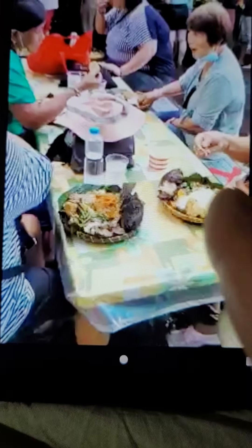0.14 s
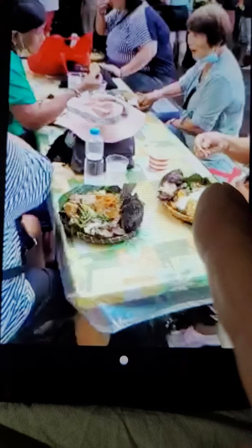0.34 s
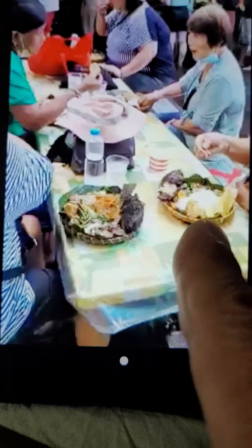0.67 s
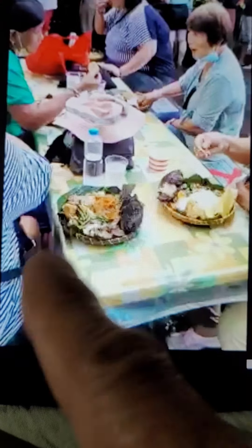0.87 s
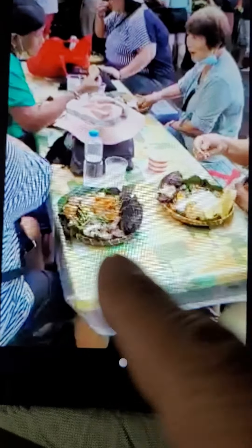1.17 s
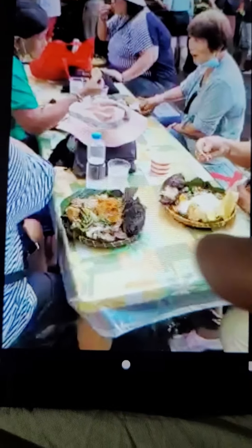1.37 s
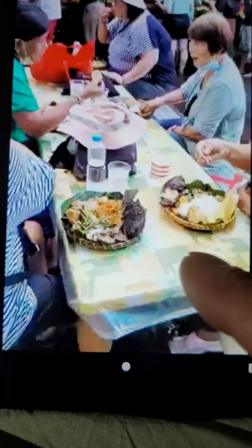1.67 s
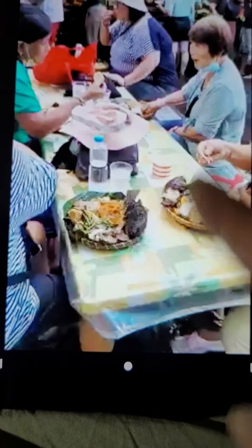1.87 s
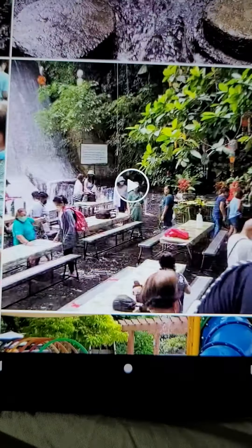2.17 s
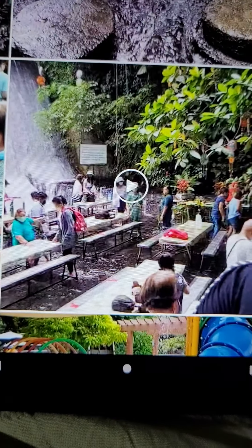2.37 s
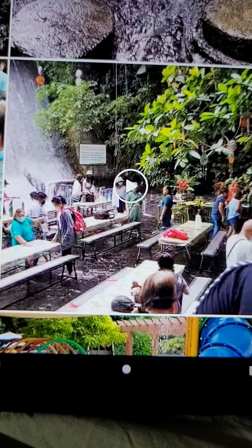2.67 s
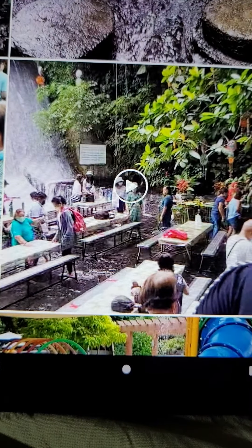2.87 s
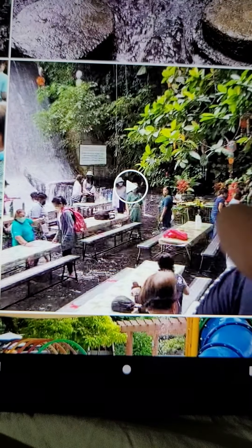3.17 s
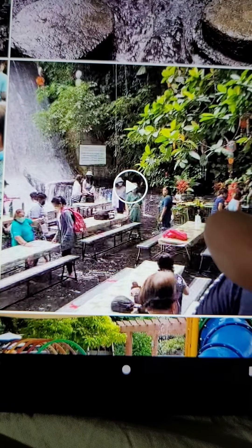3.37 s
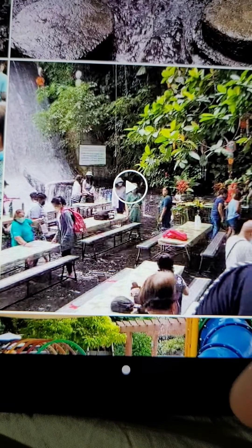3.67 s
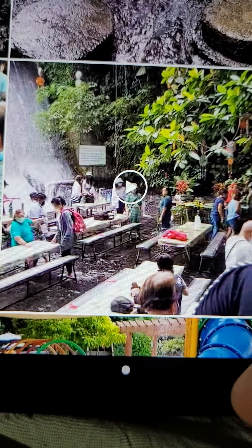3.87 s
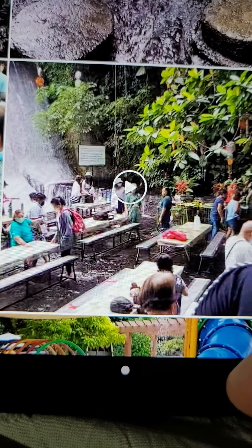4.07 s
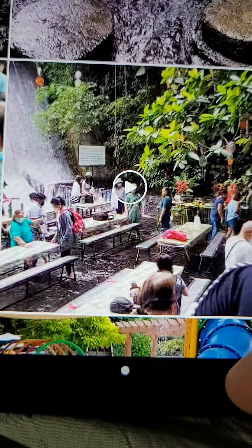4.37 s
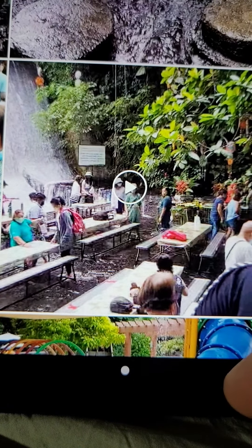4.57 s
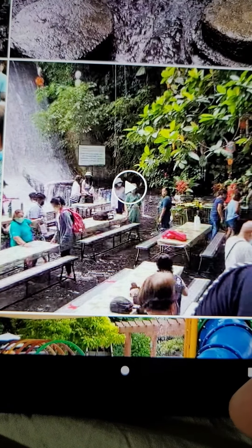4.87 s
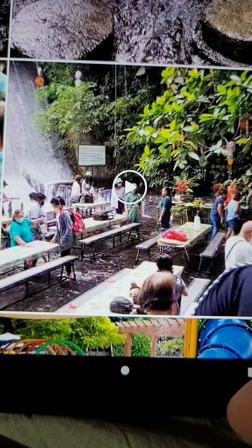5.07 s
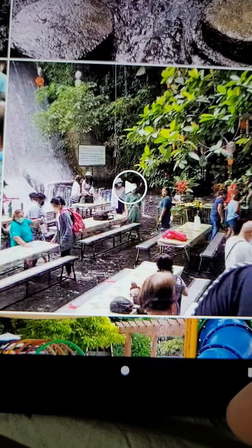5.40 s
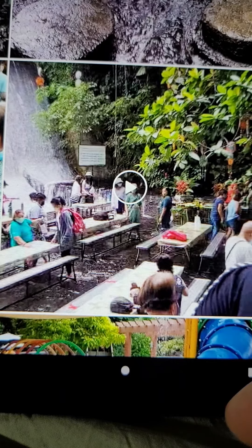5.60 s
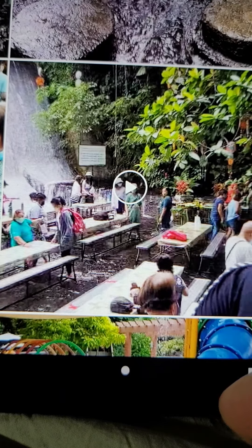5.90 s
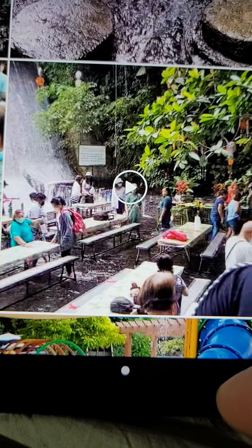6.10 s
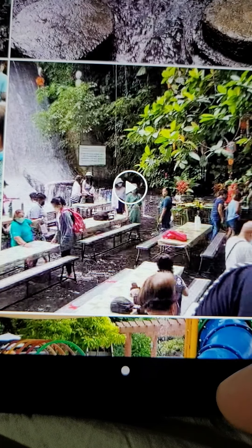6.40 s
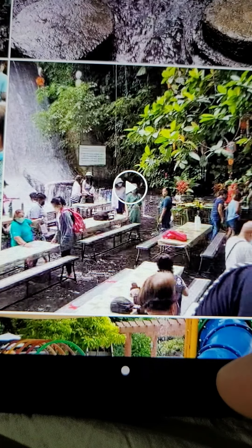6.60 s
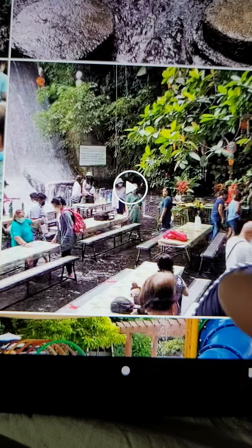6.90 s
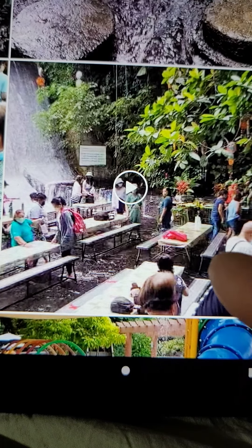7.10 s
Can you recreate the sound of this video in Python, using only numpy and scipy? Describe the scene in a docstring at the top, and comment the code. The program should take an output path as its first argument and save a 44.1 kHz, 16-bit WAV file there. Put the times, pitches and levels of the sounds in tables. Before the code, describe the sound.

The sound is heard inside a moving vehicle, through a phone's microphones, for about seven seconds. A low, nearly pure gear whine leads, throbbing against the engine's hum and a buzzing panel, over a deep drone, road rumble and rushing air. The whine is loudest from about 1 to 2 seconds, then drops and swells unevenly, sinking slightly in pitch toward the end. The air rush is stronger in the first second and eases by 2.5 seconds. Close to the microphones, a hand slides over cloth in soft, short swishes, clearest at about 0.2, 0.6 and 1.3 seconds, with another near 3 seconds and fainter ones between 4.4 and 6.8 seconds. A fingertip makes two tiny dry ticks, at about 0.5 and 2.3 seconds. A faint hiss lies under everything, and the vehicle runs on to the end.

```python
"""A gear whine near 250 Hz, heard inside a moving vehicle. It follows the engine's speed and
throbs against the engine's hum and a buzzing panel, over a low drone. Road rumble and rushing
air ring the cabin. A hand sliding over cloth next to the phone makes soft swishes, and a
fingertip ticks twice. The phone's two microphones add a faint hiss."""
import sys
import numpy as np
from scipy import signal
from scipy.fft import rfft, irfft
from scipy.io import wavfile
from scipy.ndimage import uniform_filter1d

SR = 44100
rng = np.random.default_rng(int(sys.argv[2]) if len(sys.argv) > 2 else 0)


def persist_wave(psi):
    """Save psi, clipped to +-1, as 16-bit WAV."""
    counts = np.round(np.clip(psi, -1, 1) * 32767).astype(np.int16)
    wavfile.write(sys.argv[1], SR, np.atleast_2d(counts).T)


N = 319725
T = np.arange(N) / SR
HZ = np.maximum(np.fft.rfftfreq(N, 1 / SR), 1)

# how fast the engine fires and how loud the gears whine: time_s, firing_hz, whine_db
DRIVE_TRAIN = [(0, 60.74, -33), (.35, 60.72, -29), (.85, 60.78, -29), (1.1, 61.45, -27), (2.0, 61.27, -27),
               (2.18, 60.76, -31.5), (2.36, 59.88, -39.5), (2.8, 60.13, -36.5), (3.4, 60.23, -34.5),
               (3.8, 59.56, -39.5), (4.0, 59.07, -38), (4.2, 59.25, -45), (4.6, 60.34, -36),
               (5.0, 59.56, -42.5), (5.2, 59.16, -38.5), (5.55, 59.02, -35), (5.8, 58.06, -33),
               (6.4, 57.92, -39), (6.8, 57.88, -39), (7.25, 58.1, -34)]
# how the two microphones hear the cabin: pitch_hz, likeness (0-1), left_lead_rad, left_minus_right_db
MICROPHONES = [(45, .98, .42, -3), (100, .99, .26, -.8), (254, .995, .25, -.7), (330, .97, .35, -4),
               (420, .72, .9, -3.4), (600, .75, .7, -5.5), (780, .3, 1.6, -5.5), (900, .57, 3.1, -2.2),
               (1200, .54, 3.1, -1.8), (1600, .2, 3.4, -1.7), (3000, .05, 3.4, -.5)]


def undb(db):
    return np.exp(np.asarray(db) * np.log(10) / 20)


def unit(x):
    return x / np.sqrt(np.mean(x ** 2))


def over_time(table):
    """A table's columns at every sample."""
    times, *columns = np.transpose(table)
    return [np.interp(T, times, column) for column in columns]


def over_hz(table, hz):
    """A table's columns at the given pitches."""
    pitches, *columns = np.transpose(table)
    return [np.interp(np.log(hz), np.log(pitches), column) for column in columns]


def wander(rate_hz):
    """A smooth random curve that strays about 1 either side of zero."""
    steps = 16
    held = np.repeat(rng.standard_normal(int(N / SR * rate_hz) + 2), steps)
    smooth = uniform_filter1d(uniform_filter1d(held, steps), steps)
    curve = np.interp(T * rate_hz * steps, np.arange(len(smooth)), smooth)
    return unit(curve - curve.mean())


def gate(start_s, end_s, fade_s):
    """1 between two times, with sloping edges."""
    return np.clip(np.minimum(T - start_s, end_s - T) / fade_s + .5, 0, 1)


def band(low_hz, high_hz, likeness):
    """Partly alike left and right noise between two pitches."""
    left, other = rng.standard_normal((2, N))
    right = likeness * left + np.sqrt(1 - likeness ** 2) * other
    bandpass = signal.butter(2, [low_hz, high_hz], "bandpass", fs=SR, output="sos")
    return unit(signal.sosfilt(bandpass, [left, right]))


def tone(hz, db, waver_db, wobble_hz):
    """A wavering pure tone; each microphone hears it with its own timing and level."""
    _, lead, pan_db = over_hz(MICROPHONES, np.mean(hz))
    phase = 2 * np.pi * (np.cumsum(hz + wobble_hz * wander(6)) / SR + rng.random())
    size = np.sqrt(2) * undb(db + waver_db * wander(9))
    left = undb(pan_db / 2) * np.sin(phase + lead / 2)
    right = undb(-pan_db / 2) * np.sin(phase - lead / 2)
    return size * np.array([left, right])


def engine():
    """The engine hums at multiples of its firing rate; weak tones, one from the gears, come and go."""
    # tones at 1, 2 and 4 times the firing rate: time_s, first_db, second_db, fourth_db
    main_tones = [(0, -64, -49.5, -40), (.8, -49, -54.5, -49), (2.0, -50.5, -62, -43),
                  (2.5, -49, -47.5, -55.5), (3.6, -50.5, -49, -52), (4.1, -42, -47.5, -47.5),
                  (4.8, -48.5, -49.5, -51), (5.5, -42.5, -48, -49), (5.9, -41, -54, -43.5),
                  (7.25, -41.5, -49.5, -42)]
    # weaker engine tones and a faint third harmonic of the gear whine (multiple 12.5):
    # multiple, start_s, end_s, level_db
    weak_tones = [(2.5, 4, 8.3, -63), (3, 0, 4, -57), (6, 0.5, 5.2, -61), (6, 6, 7.3, -57.5),
                  (7, -1, 0.48, -63.5), (11, 0.5, 1.5, -65), (7, 1.9, 6.2, -59.5), (7.34, 6, 7.3, -59.5),
                  (8, 0.5, 6, -60), (8, 6, 7.3, -60.5), (9, 3, 5.2, -63), (9.36, 5.5, 7.35, -59),
                  (11, 1.5, 3.7, -67), (12, 5.5, 6.5, -64.5), (12, 6.9, 7.4, -66.5), (12.5, 3, 5.7, -68)]
    hz = over_time(DRIVE_TRAIN)[0]
    first_db, second_db, fourth_db = over_time(main_tones)
    out = tone(hz, first_db, waver_db=.52, wobble_hz=.2)
    out += tone(2 * hz, second_db, waver_db=.36, wobble_hz=.42)
    out += tone(4 * hz, fourth_db, waver_db=1.8, wobble_hz=.41)
    for multiple, start_s, end_s, db in weak_tones:
        overtone = tone(multiple * hz, db + 2.1 * wander(1.2), waver_db=.48, wobble_hz=.33)
        out += gate(start_s, end_s, fade_s=.36) * overtone
    return out


def gear_whine():
    """The gears sing a nearly pure tone tied to engine speed, with a faint octave above."""
    # the tone at twice the whine's pitch: time_s, level_db
    octave_levels = [(0, -53.5), (.45, -51.5), (.85, -59), (1.3, -56), (2.2, -58.5), (3.4, -55),
                     (4.2, -57.5), (4.9, -61.5), (5.8, -58), (6.5, -66), (7.25, -65)]
    gear_ratio = 4.165
    firing_hz, db = over_time(DRIVE_TRAIN)
    hz = gear_ratio * firing_hz
    # lightly loaded gears chatter, so the quieter whine throbs more
    chatter_db = .14 * (db.max() - db) * wander(32)
    octave_db = over_time(octave_levels)[0] + 2 * wander(4)
    octave = tone(2 * hz, octave_db, waver_db=2.2, wobble_hz=1.2)
    return tone(hz, db + chatter_db, waver_db=.5, wobble_hz=.4) + octave


def drone():
    """A deep tone wavers below the engine's hum."""
    # the drone's path: time_s, pitch_hz, level_db
    path = [(0, 52.2, -48), (.4, 52.05, -46.5), (.8, 49.3, -54.5), (1.5, 48.26, -48.5), (2.1, 47.35, -56),
            (2.9, 49.05, -54.5), (7.25, 49.46, -68)]
    return tone(*over_time(path), waver_db=2.8, wobble_hz=.3)


def panel_buzz():
    """A panel vibrates just above the whine's pitch, so the two throb together."""
    # the panel's vibration: time_s, pitch_hz, level_db
    vibration = [(0, 277, -52), (2.3, 277.1, -51.5), (3.9, 278.3, -50.5), (4.3, 272.9, -49.5),
                 (5.0, 277, -49.5), (5.7, 274.1, -53), (6.8, 268.8, -50), (7.25, 269.8, -53)]
    return tone(*over_time(vibration), waver_db=3, wobble_hz=5)


def road_and_air():
    """Road and air noise ring the cabin; octave-wide slices swell together and flicker alone."""
    # the noise's balance from bass to treble: pitch_hz, relative_db
    noise_shape = [(25, -29.5), (45, -13), (70, -14), (100, -12.5), (170, -12.5), (250, -2.5), (290, -5),
                   (400, -15), (520, -14.5), (800, -24), (1000, -28), (1700, -34), (1980, -37.5),
                   (2200, -43), (4000, -60.5)]
    # pitches at which the cabin rings: pitch_hz, width_hz, boost_db
    cabin_rings = [(80, 14, 1.5), (99, 9.8, 4.5), (152, 21, 3.5), (213, 8.2, 2.5), (241, 9.1, 2),
                   (267, 7.7, 4), (337, 18, 6), (437, 22, 3), (525, 15, 2.5), (1050, 140, 3.5),
                   (1435, 50, 3.5)]
    # the air rush, from about 500 Hz up: time_s, boost_db
    air_rush = [(0, 4.5), (.7, 5), (1.3, 2.5), (2.6, 0), (3.4, 1), (4.2, -0.5), (5, 0), (6.5, -0.5),
                (7.25, -0.5)]
    level_db = -42
    likeness, lead, pan_db = over_hz(MICROPHONES, HZ)
    left, other = rfft(rng.standard_normal((2, N)))
    right = likeness * left * np.exp(-1j * lead) + np.sqrt(1 - likeness ** 2) * other
    ring_db = sum(db / (1 + (2 * (HZ - hz) / width) ** 2) for hz, width, db in cabin_rings)
    spectrum = np.array([left * undb(pan_db / 2), right * undb(-pan_db / 2)])
    spectrum *= undb(over_hz(noise_shape, HZ)[0] + ring_db)
    spectrum /= np.std(irfft(spectrum, N))
    rumble_db = np.linspace(2, -.5, N)  # the rumble eases slowly
    rush_db = over_time(air_rush)[0]
    out, swell_db = 0, .55 * wander(.7)
    for octave in range(5, 13):  # slices centred on 32 to 4096 Hz
        share = np.clip(1 - abs(np.log2(np.clip(HZ, 32, 4096)) - octave), 0, 1)
        slow_db = rumble_db if octave < 9 else rush_db
        flicker_db = 1.2 * wander(6)
        out += undb(slow_db + swell_db + flicker_db) * irfft(spectrum * share, N)
    return out * undb(level_db)


def microphone_hiss():
    """Each microphone makes its own steady hiss."""
    # the hiss's balance: pitch_hz, relative_db
    hiss_shape = [(1500, -5), (3000, 3), (5900, -1), (6450, 3), (7200, -1), (9000, -2), (9800, -1),
                  (10400, -5.5), (12000, -7.5), (15600, -5)]
    level_db = -79.5
    spectrum = rfft(rng.standard_normal((2, N))) * undb(over_hz(hiss_shape, HZ)[0])
    return unit(irfft(spectrum, N)) * undb(level_db)


def hand_on_cloth():
    """Skin sliding over fibres hisses, louder and brighter the faster it moves."""
    # hand strokes: start_s, rise_s, hold_s, late_speed (1 = speed as the hold begins), fade_s,
    # level_db, shine_db and body_db (both added to level_db), left_minus_right_db
    strokes = [(-.05, 0.11, 0.13, 0.92, .15, -71.5, 1.5, -1, -5),
               (0.166, 0.047, 0.093, 0.7, .13, -63.5, -1, 2, 1.5),
               (0.472, 0.072, 0.0094, 0.87, .15, -74.5, -1, -6.5, -5),
               (0.611, 0.06, 0.088, 0.62, .09, -59.5, -2.5, 3, 1.5),
               (0.807, 0.07, 0.04, 0.75, 0.12, -69.5, -7.5, -1.5, -1.5),
               (1.234, 0.077, 0.18, 0.83, .15, -62.5, 1, -10, -6),
               (1.563, 0.077, 0.075, .8, .15, -77, -2, -10.5, -2.5),
               (1.84, 0.046, 0.016, 0.84, .15, -77, 3, -13, -2),
               (2.188, 0.044, 0.021, .8, .15, -77, 0.5, -11, 1),
               (2.996, 0.088, .16, 1.3, .12, -71.5, -2.5, -8, -4.5),
               (4.405, 0.045, 0.11, .8, 0.13, -79, -1, -11, -3),
               (4.7, 0.089, 0.068, .95, .04, -82.5, -3, -6, -1),
               (5.502, 0.059, 0.13, .8, .15, -88.5, -12, -4, 2.5),
               (6.2, 0.098, 0.14, 0.74, .08, -80.5, -5.5, 3, 0.5),
               (6.653, 0.053, 0.053, 0.9, .1, -82.5, -1, 4.5, -1)]
    # the resting hand never lies quite still: time_s, level_db
    fidget = [(0, -75), (.45, -77), (1.0, -80), (1.2, -84), (2, -89), (4, -91), (5.2, -88), (7.25, -90)]
    creep_s, creep_speed = .23, .036  # the cloth keeps creeping after a stroke
    middle = band(3400, 8000, likeness=.086)
    shine = band(8000, 13800, likeness=.1)
    body = band(1300, 2900, likeness=.24)
    middle += undb(-11) * band(3500, 4600, likeness=.1)  # the weave rasps
    fidget_db = over_time(fidget)[0] + 1.2 * wander(5)
    out = undb(fidget_db) * (middle + undb(-3) * band(2200, 3400, likeness=.1))
    shine += undb(-5.5) * band(10800, 12300, likeness=.1)  # a bright glint
    body += undb(-6) * band(1200, 1900, likeness=.16)  # a dull scuff
    for start_s, rise_s, hold_s, late_speed, fade_s, db, shine_db, body_db, pan_db in strokes:
        times = np.cumsum([start_s, rise_s, hold_s, fade_s, creep_s])
        speed = np.interp(T, times, [0, 1, late_speed, creep_speed, 0])
        # the shine needs speed and dies first; the body lasts longest
        swish = speed ** 1.1 * middle + speed ** 1.6 * undb(shine_db) * shine
        swish += speed * undb(body_db) * body
        out += undb(db + np.array([[pan_db], [-pan_db]]) / 2) * swish
    return out * undb(.5 * wander(40))


def faint_hisses():
    """Faint hisses come and go, each around its own pitch."""
    # the hisses: start_s, length_s, pitch_hz, width_hz, level_db
    hisses = [(0, .9, 535, 30, -58), (0, .95, 1000, 500, -65), (3.705, .075, 1650, 400, -64.5),
              (3.71, .13, 2700, 700, -78), (5.05, .75, 4040, 350, -91), (2.55, .35, 4040, 350, -92),
              (5.0, .95, 900, 800, -66), (6.62, .45, 3130, 60, -89)]
    out = 0
    for start_s, length_s, hz, width_hz, db in hisses:
        noise = band(hz - width_hz / 2, hz + width_hz / 2, likeness=.64)
        out += undb(db) * gate(start_s, start_s + length_s, fade_s=.03) * noise
    return out


def fingertip_ticks():
    """A fingertip makes tiny dry clicks: bursts of noise that die at once."""
    # the clicks: start_s, level_db, low_hz, high_hz
    clicks = [(0.529, -61, 2500, 9500), (2.33, -65, 9500, 13490)]
    out, decay_s = 0, .0015
    for start_s, db, low_hz, high_hz in clicks:
        burst = (T >= start_s) * np.exp(-abs(T - start_s) / decay_s)
        out += undb(db) * burst * band(low_hz, high_hz, likeness=.6)
    return out


def scene():
    vehicle = engine() + gear_whine() + drone() + panel_buzz() + road_and_air()
    return vehicle + microphone_hiss() + hand_on_cloth() + faint_hisses() + fingertip_ticks()


def record(dry):
    """The microphone openings colour the treble and the phone cuts off the very top."""
    # how the openings lift or lower the treble: pitch_hz, boost_db
    colour = [(1900, 0), (2250, -2), (3100, 0.5), (3550, -2), (3950, 1.5), (4600, 0), (5900, -1),
              (6400, -1), (7800, 0), (8600, -0.5), (10000, -0.5), (11900, -2), (13000, -1.5), (15600, -2)]
    top_hz, edge_samples = 15680, 4096
    padded = np.pad(dry, [(0, 0), (edge_samples, edge_samples)], "reflect", reflect_type="odd")
    length = N + 2 * edge_samples
    hz = np.maximum(np.fft.rfftfreq(length, 1 / SR), 1)
    coloured = irfft(rfft(padded) * undb(over_hz(colour, hz)[0]), length)
    lowpass = signal.ellip(10, .2, 60, top_hz, fs=SR, output="sos")
    return signal.sosfilt(lowpass, coloured[:, edge_samples:-edge_samples])


dry = scene()
out = record(dry)
persist_wave(out)
```